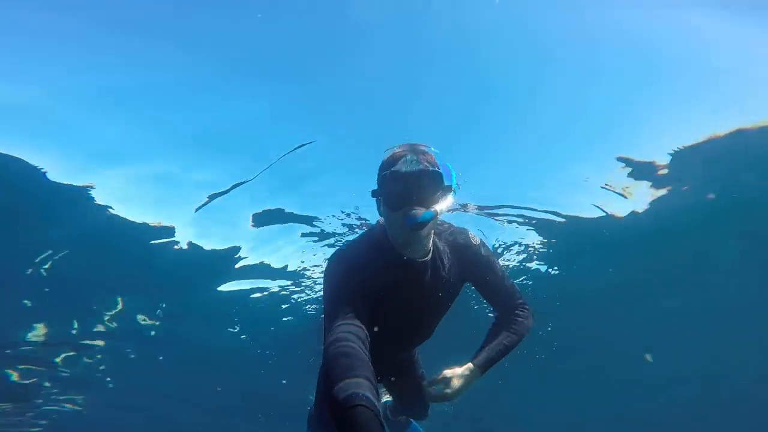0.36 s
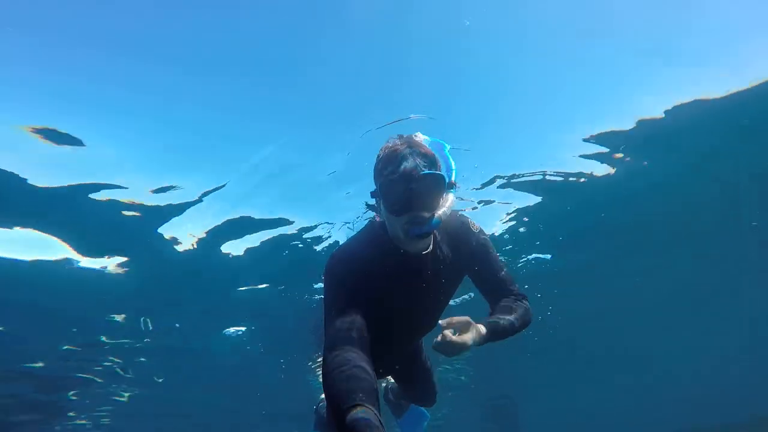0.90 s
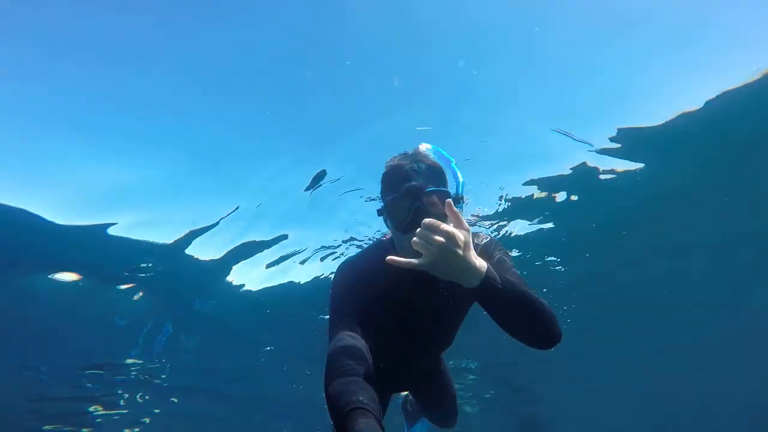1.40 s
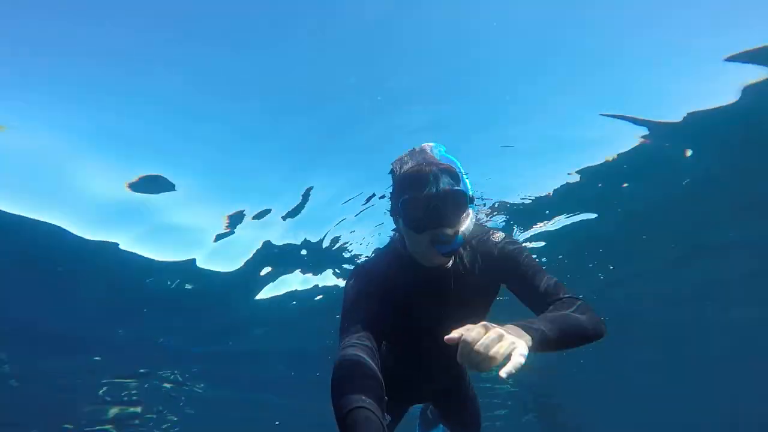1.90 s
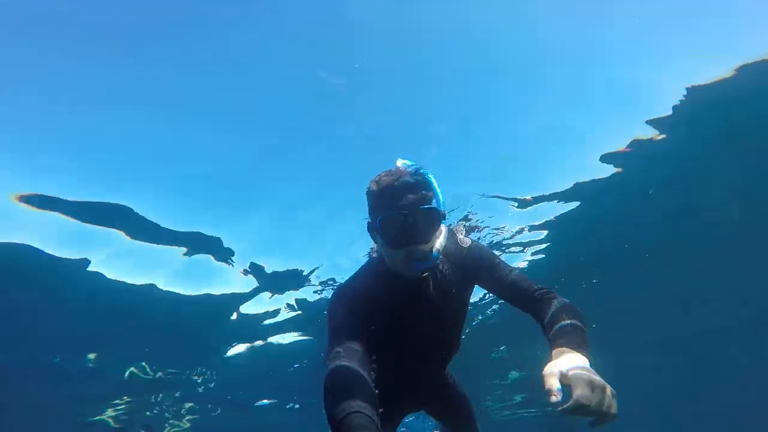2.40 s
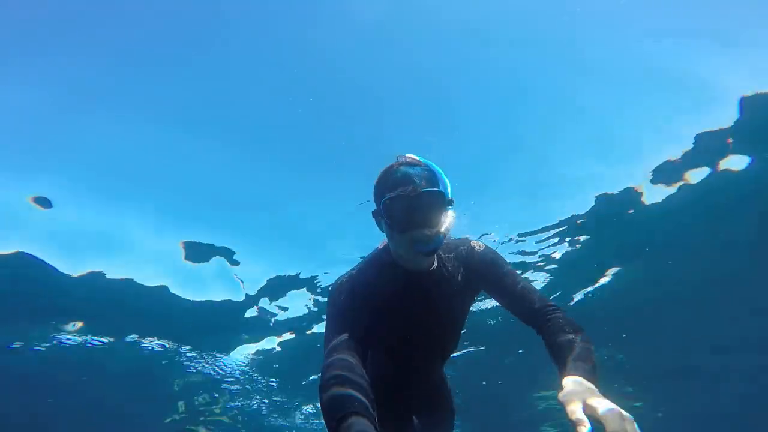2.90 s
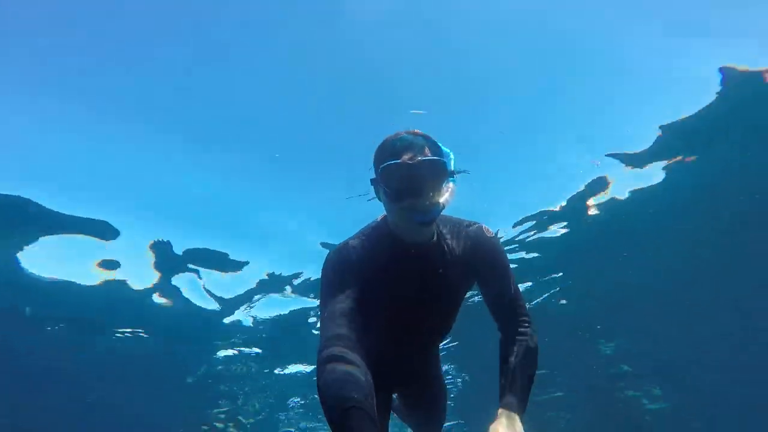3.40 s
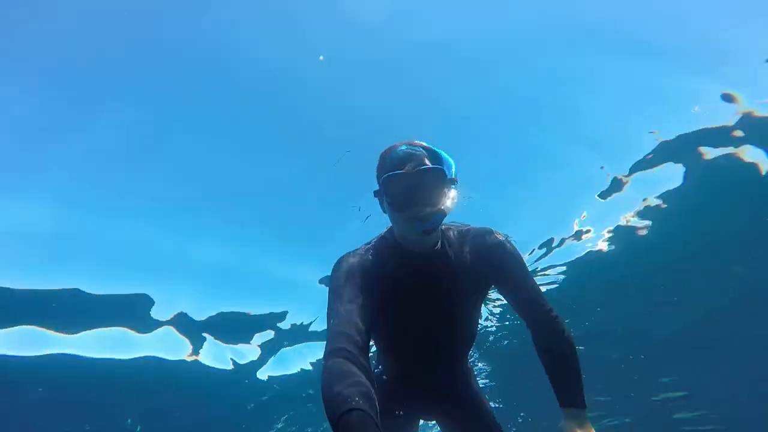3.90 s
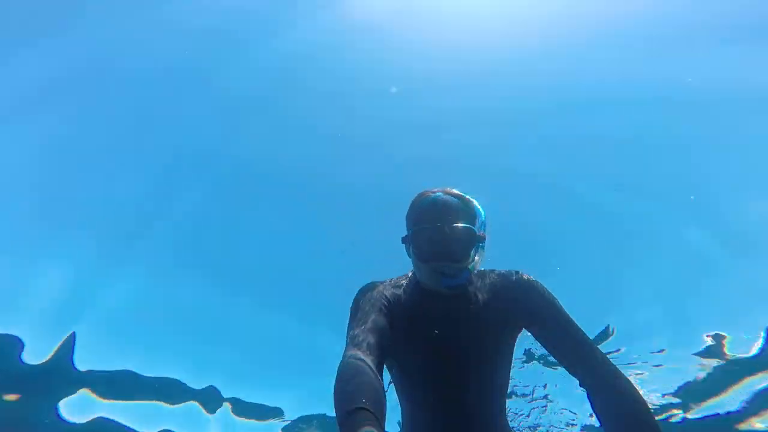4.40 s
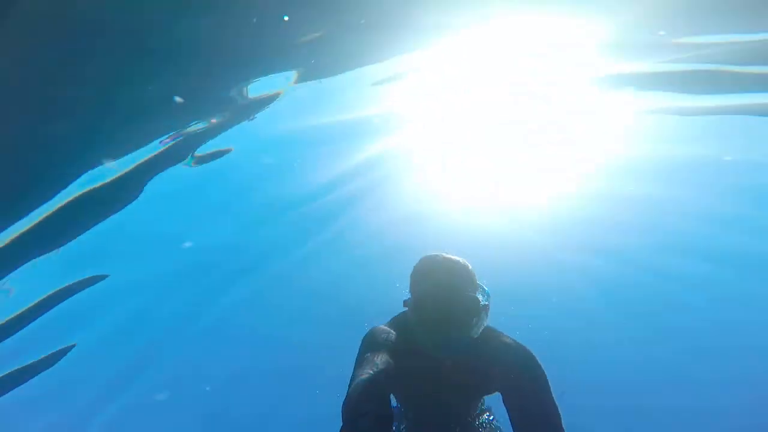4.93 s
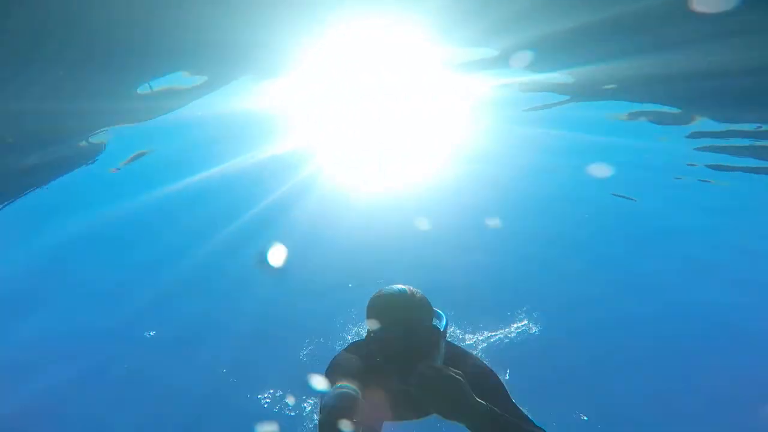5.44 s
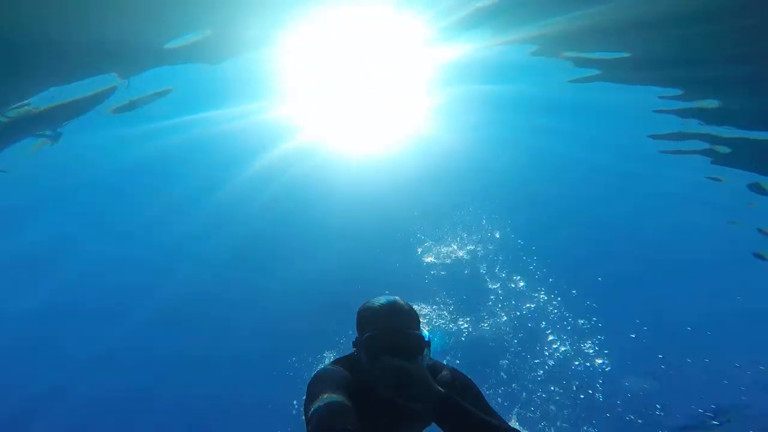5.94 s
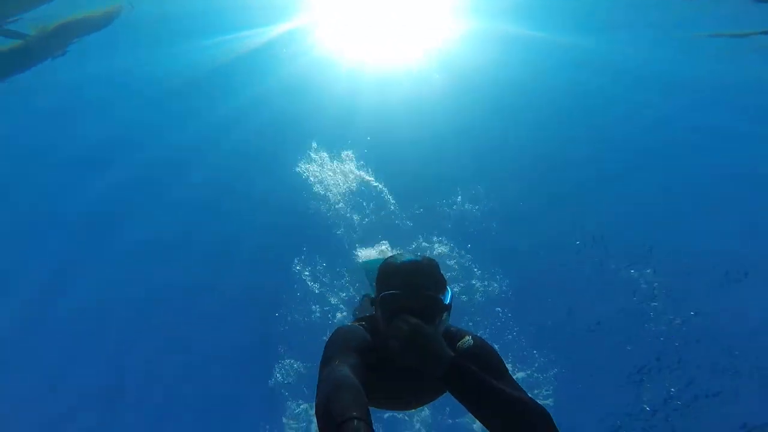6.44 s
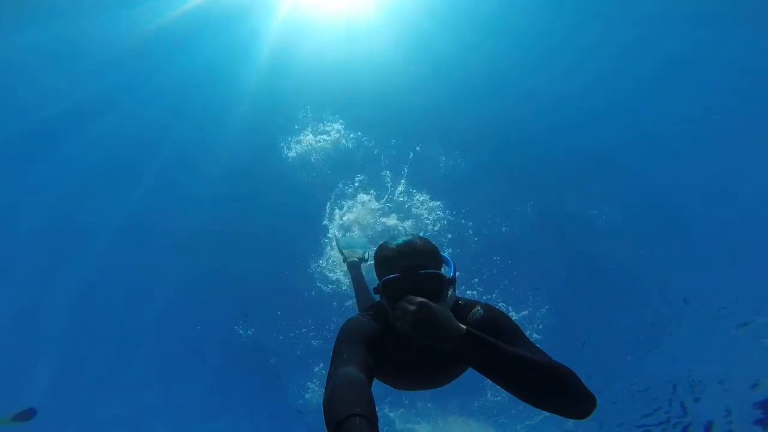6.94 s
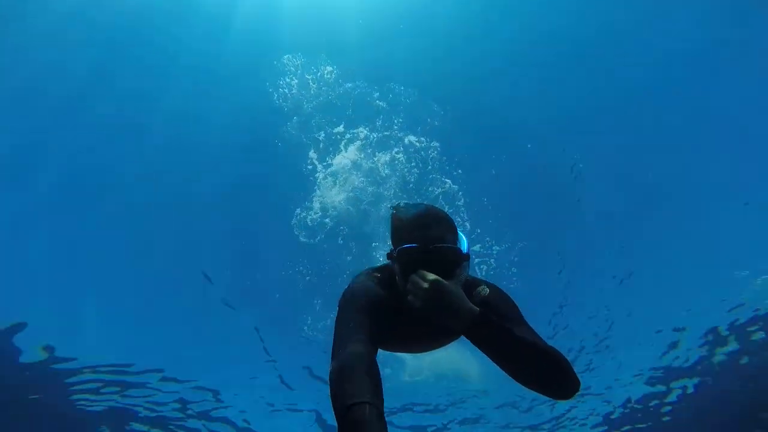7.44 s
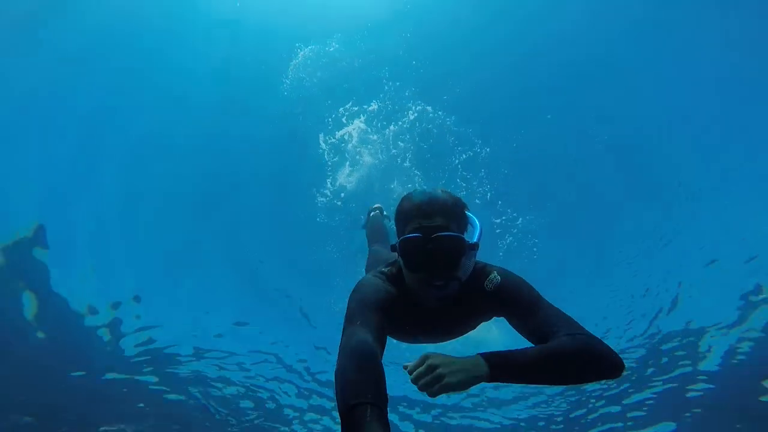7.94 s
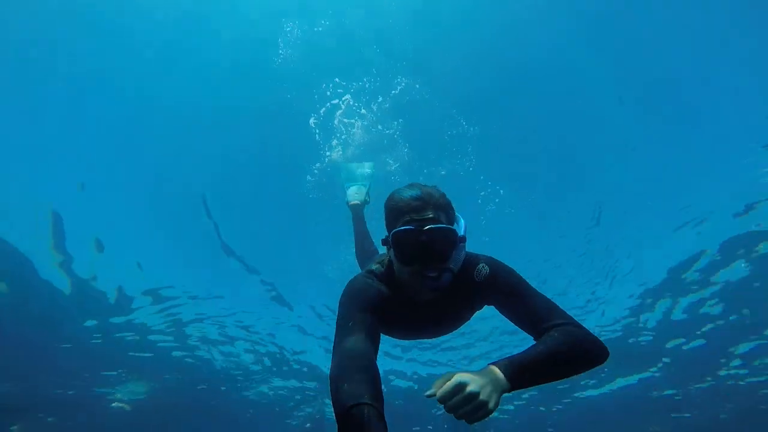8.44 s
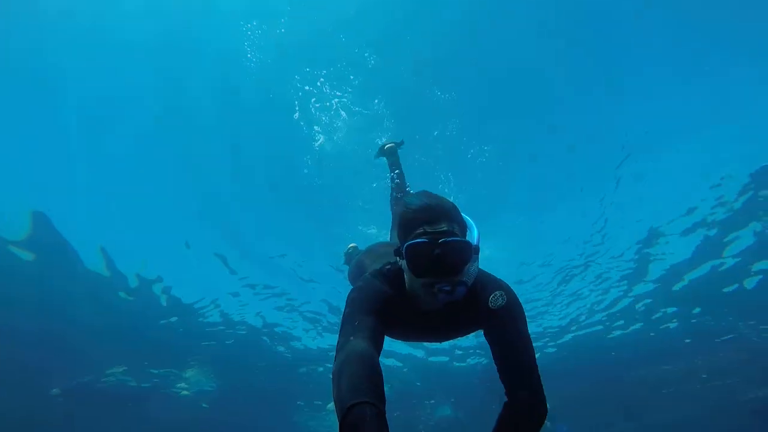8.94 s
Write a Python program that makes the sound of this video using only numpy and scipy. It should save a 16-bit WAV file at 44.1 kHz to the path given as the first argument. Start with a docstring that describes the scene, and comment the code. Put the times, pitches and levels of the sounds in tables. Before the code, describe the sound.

Muffled underwater rush in a sealed camera housing, bubbles plinking and glugging, then a violent burst of thumps, crackles and squeaks before a deeper hum.

```python
"""Snorkeller's dive, heard inside a sealed housing

A small camera in a sealed housing is held under the sea by a snorkeller who then dives.
The sea's rush is noise through the housing's resonances, with thin wavering sines whining beside it;
passing water is gusty low rumble with surges and thumps, and bubbles plink and glug as gliding sines.
In the turn at the surface trapped air crackles, squeaks and rattles out of the gaps: rings, pulses, noise ticks."""
import sys
import numpy as np
from scipy import signal
from scipy.fft import rfft, irfft
from scipy.io import wavfile
from scipy.ndimage import uniform_filter1d

SR = 44100
rng = np.random.default_rng(int(sys.argv[2]) if len(sys.argv) > 2 else 0)


def master_out(mix):
    """Clip the mix to full scale and print it as 16-bit PCM to the path in sys.argv[1]."""
    frames = np.transpose(np.atleast_2d(mix))
    ceiling = np.clip(frames, -1, 1)
    pcm = np.round(ceiling * 32767).astype(np.int16)
    wavfile.write(sys.argv[1], SR, pcm)


def nominal_scale(level):
    """Amplitude ratio for a level in decibels (scalar or array-like)."""
    x = np.asarray(level, float) / 20
    return 10 ** x


N = 400428
T = np.arange(N) / SR
DIVE_S, DIVE_LENGTH_S = 5.345, 0.62


def columns(table):
    """Each column after the first as a curve, joined by straight lines in time."""
    s, *rest = np.transpose(table)
    return [np.interp(T, s, c) for c in rest]


def band(x, hz, width_hz):
    """A steep resonance (applied twice) with gain 1 at the centre."""
    freq = np.arange(len(x) // 2 + 1) * SR / len(x) + 1  # the 1 avoids dividing by zero
    response = 1 / (1 + 1j * (freq - hz ** 2 / freq) / width_hz) ** 2
    return irfft(rfft(x) * response, len(x))


def unit(x):
    """Scale to rms 1."""
    return x / np.sqrt(np.mean(x ** 2))


def peak(x):
    """Scale to peak 1."""
    return x / np.abs(x).max()


def walk(rate):
    """Random levels held 1 / rate s and slewed twice; spread near 1."""
    hold = int(SR / rate)
    steps = np.repeat(rng.standard_normal(N // hold + 1), hold)
    return 1.3 * uniform_filter1d(uniform_filter1d(steps, hold), hold)[:N]


def add(out, s, grain):
    """Mix a grain in at time s."""
    i = int(s * SR)
    out[i:i + len(grain)] += grain[:N - i]


def ring(hz, t60, octaves, attack_ms):
    """A decaying sine that starts at hz and glides by the given octaves over its 60 dB decay time t60."""
    t = T[:int(t60 * SR)]
    phase = 2 * np.pi * np.cumsum(hz * 2 ** (octaves * t / t60)) / SR
    attack = 1 - np.exp(-(1000 * t / attack_ms) ** 2)
    shape = attack * 1000 ** (-t / t60)
    return np.sin(phase) * shape / shape.max()


def swell(from_hz, to_hz, length, bend):
    """A sine that swells and fades; its glide levels off early when bend is above 1."""
    along = np.linspace(0, 1, int(length * SR))
    hz = to_hz + (from_hz - to_hz) * (1 - along) ** bend
    phase = 2 * np.pi * np.cumsum(hz) / SR
    return np.sin(phase) * np.sin(np.pi * along ** 0.91)


# The sea's drive on the housing. Each row: time in seconds, noise level in dB,
# share of the deeper colour added to the dive's own 0 to 1.
SEA = [(0.0, -14.5, 0.0), (4.81, -14, 0.16), (5.13, -8.5, 0.84), (5.44, -16, 0.23), (6.12, -12, 0.0),
       (9.08, -11.5, 0.15)]


def drive_and_depth():
    """Level of the rush in dB, and depth: the dive's ramp from 0 to 1 plus passing shifts of colour."""
    level_db, extra = columns(SEA)
    dive = np.clip((T - DIVE_S) / DIVE_LENGTH_S, 0, 1)
    return level_db, np.clip(dive + extra, 0, 1.3)


# Housing resonances rung by the rush. Each row: centre in Hz, width of each filter pass in Hz,
# gain in dB near the surface, gain in dB deeper.
HOUSING = [(196, 187, -9.5, -7), (350, 276, -10.5, -7.5), (508.6, 125, -5.5, -5), (615, 137, 1, 2.5),
           (779, 125, -10, -1), (1219, 59, -16.5, -71), (1282, 118, -21.5, -12), (1640, 240, -22.5, -8.5),
           (1930, 195, -23.5, -14.5), (2126, 154, -17, -10.5), (2350, 200, -21.5, -19.5),
           (2580, 200, -21.5, -20), (2980, 353, -24.5, -23), (3733, 765, -27.5, -26.5),
           (5130, 580, -37.5, -38.5), (6300, 750, -41.5, -43.5), (7830, 1860, -47, -48.5),
           (9160, 1100, -51.5, -45), (10670, 1800, -51.5, -49.5), (12900, 2500, -52.5, -52.5)]


def sea(level_db, depth):
    """The rush in the housing's resonances, each flickering alone; pressure shifts their balance."""
    out = np.zeros(N)
    for hz, width_hz, near_db, deep_db in HOUSING:
        noise = band(rng.standard_normal(N), hz, width_hz)
        balance_db = near_db + depth * (deep_db - near_db)
        flicker_db = min(1.2, 4000 / hz) * walk(9)  # steadier in the treble
        out += noise * nominal_scale(level_db + balance_db + flicker_db)
    # under pressure two neighbouring resonances cancel between them
    return out - 0.64 * np.clip(depth, 0, 1) * band(out, 1043, 350)


# Water pushing past the housing. Each row: time in seconds, rumble rms in dB before gusts.
FLOW = [(0.0, -30.5), (1.39, -37.5), (2.6, -35.5), (3.54, -29), (3.87, -36), (4.1, -28.5), (4.45, -26.5),
        (4.8, -17.5), (5.15, -19), (5.5, -24), (5.65, -31), (5.9, -25), (6.6, -27.5), (7.13, -30),
        (7.55, -23), (7.95, -35.5), (8.85, -29.5), (9.05, -24)]


def flow():
    """Pressure swings of passing water: gusty rumble and a rougher buffeting that grows in strong flow."""
    level_db, = columns(FLOW)
    level_db = level_db + 3.0 * walk(7)  # gusts
    rumble = unit(band(band(rng.standard_normal(N), 30.7, 45.4), 34.5, 56.6))
    buffet_db = -15.5 + 0.11 * (level_db + 32) + 2.0 * walk(25)  # against the rumble
    buffet = unit(band(rng.standard_normal(N), 132.5, 120)) * nominal_scale(buffet_db)
    return nominal_scale(level_db) * (rumble + buffet)


# Heavy swings of water that shake the whole housing. Each row: start in seconds, peak in dB.
SURGES = [(3.489, -15), (4.53, -9), (4.88, -5), (4.995, -3.5), (5.046, -11), (5.194, -6), (5.86, -16),
          (5.973, -13), (6.006, -12.5)]


def surges():
    """The whole housing swings for about two low cycles."""
    out = np.zeros(N)
    for s, db in SURGES:
        add(out, s, nominal_scale(db) * swell(46.6, 46.6, 0.048, 1))
    return out


# Blows of water against the housing. Each row: start in seconds, peak in dB.
THUMPS = [(.372, -11.5), (2.39, -16), (3.236, -13), (4.513, -14), (4.692, -18), (4.718, -17), (4.756, -7.5),
          (4.822, -5), (4.995, -8), (5.109, -16), (5.856, -13)]


def thumps():
    """A blow rings for about one cycle while its pitch drops."""
    out, hz = np.zeros(N), 147
    for s, db in THUMPS:
        add(out, s, nominal_scale(db) * ring(hz, 1.15 / hz, -1.6, 0.7))
    return out


# Small bubbles. Each row: start in seconds, peak of the plink in dB, starting pitch in Hz.
BUBBLES = [(.07, -18, 795), (.159, -21, 820), (.666, -14, 554), (.751, -15, 758), (1.195, -18, 803),
           (1.266, -16, 732), (1.331, -21.5, 740), (1.397, -16.5, 853), (1.52, -19.5, 812),
           (1.68, -22, 836), (2.805, -16.5, 723), (2.822, -6.5, 695), (2.947, -18, 707), (3.017, -26, 684),
           (3.05, -15, 654), (3.212, -16.5, 727), (3.238, -24.5, 660), (3.377, -17, 720), (3.479, -18, 657),
           (3.631, -18.5, 820), (3.748, -20.5, 780), (3.763, -18, 726), (4.254, -14.5, 830),
           (4.305, -9.5, 1270), (4.995, -20, 746), (5.139, -14.5, 620.6), (5.164, -8, 635)]


def plinks():
    """Small bubbles plink with a rising pitch, and their pinch-off raps the housing."""
    out, rap = np.zeros(N), np.zeros(N)
    for s, db, hz in BUBBLES:
        louder_db = db + 15  # against a typical bubble
        rise_octaves = 0.32 - 0.02 * louder_db  # quiet bubbles glide further
        rap_db = -17.5 + 0.18 * louder_db  # the rap grows more slowly than the bubble
        add(out, s, nominal_scale(db) * ring(hz, 0.041, rise_octaves, 1.0))
        add(out, s, nominal_scale(rap_db) * ring(685, 0.035, 0, 0.3))
        rap[int(s * SR) + 15] = nominal_scale(-5)
    return out + band(rap, 1100, 1100)


# Large air pockets. Each row: start in seconds, length in seconds, peak in dB.
GLUGS = [(0.059, .058, -30), (.125, 0.061, -31.5), (0.368, 0.026, -21), (.74, 0.054, -33),
         (1.192, 0.11, -23.5), (1.268, 0.12, -23), (1.341, 0.099, -21.5), (1.408, 0.17, -32),
         (1.618, .12, -36), (2.795, 0.056, -25), (2.942, 0.1, -18), (3.019, 0.054, -19.5),
         (3.16, 0.069, -29), (3.207, 0.054, -20), (3.307, .08, -25.5), (3.402, 0.051, -21.5),
         (3.57, .057, -29.5), (3.623, 0.092, -24.5), (3.741, 0.057, -26.5), (4.247, 0.057, -26.5),
         (5.851, 0.05, -18), (6.329, .05, -25), (6.66, .11, -26), (6.765, 0.089, -26.5),
         (7.944, 0.048, -21), (8.087, 0.097, -27.5), (8.407, 0.18, -32.5), (8.674, 0.066, -27.5),
         (8.792, 0.04, -24.5)]


def glugs():
    """Large pockets swell and fade, climbing in pitch near the surface and holding it deeper."""
    out = np.zeros(N)
    top_hz, climb_hz_per_s, lowest_hz, deep_hz = 141.4, 605, 81, 105
    for s, length, db in GLUGS:
        if s < DIVE_S:
            # all climb to one top pitch, from lower down the longer they last
            low_hz = max(lowest_hz, top_hz - climb_hz_per_s * length)
            pocket = swell(low_hz, top_hz, length, 1.17)
        else:
            held_hz = deep_hz * (1 + 0.025 * rng.standard_normal())
            pocket = swell(held_hz, held_hz, length, 1)
        add(out, s, nominal_scale(db) * pocket)
    return out


# Smaller air pockets. Each row: start in seconds, length in seconds, start pitch in Hz,
# end pitch in Hz, peak in dB.
CHIRPS = [(3.478, 0.022, 1390, 2260, -15.5), (4.855, .012, 740, 642, -.5), (4.974, 0.051, 218, 247, -24),
          (5.072, 0.038, 223, 262, -23.5), (5.128, 0.025, 350, 390, -17), (5.381, 0.013, 1020, 1070, -17)]


def chirps():
    """Smaller pockets chirp or hoot: short swelling sines that glide."""
    out = np.zeros(N)
    for s, length, from_hz, to_hz, db in CHIRPS:
        add(out, s, nominal_scale(db) * swell(from_hz, to_hz, length, 1.42))
    return out


# Cracks of air leaving the gaps. Each row: start in seconds, level in dB before the housing wall, pitch in Hz.
CRACKS = [(.6665, -20, 1590), (3.237, -33, 1700), (3.4795, -28, 1490), (4.5195, -22.5, 1556),
          (4.6085, -37, 4460), (4.618, -32, 5130), (4.6315, -28, 4820), (4.6441, -16.5, 2780),
          (4.6535, -25, 4100), (4.7226, -26, 1600), (4.864, -22, 3180), (4.9291, 0, 1433),
          (4.9391, -8, 2800), (4.9489, 1, 1670), (4.9587, -17, 1640), (5.008, 0, 1554), (5.018, -7, 1610),
          (5.029, -21, 4170), (5.0496, -18, 1640), (5.0705, -9, 1670), (5.0898, -17, 1300),
          (5.0955, -30, 2260), (5.1116, -5.5, 1460), (5.1884, -16, 1880), (5.1635, -20, 1710),
          (5.201, -18, 1550), (5.2536, -13, 1570), (5.3193, -4, 2350), (5.4063, -25.5, 4200),
          (5.5254, -34.5, 5230), (5.5544, -35, 4950), (5.84, -35, 3850), (6.368, -36, 3780),
          (6.503, -39, 5000), (7.7, -39, 4150), (8.86, -40, 4000)]


def cracks(rattle_rows):
    """Each crack rings a small bubble with an upper ring and knocks the housing roughly."""
    out = np.zeros(N)
    fade = 1000 ** (-T[:2048] / 0.021)
    for s, db, hz in [*CRACKS, *(row[:3] for row in rattle_rows)]:
        rough = fade * rng.standard_normal(len(fade))
        knock = band(rough, hz, 0.5 * hz)
        knock += nominal_scale(-8.0) * band(rough, 1770, 1200) + nominal_scale(-17) * band(rough, 2040, 1500)
        t60 = 0.013 + 0.008 * rng.random()
        add(out, s, nominal_scale(db) * ring(hz, t60, 0.12, 0.16))
        add(out, s, nominal_scale(db - 7) * ring(1.87 * hz, t60, 0.1, 0.1))
        add(out, s, nominal_scale(db - 3.5) * peak(knock))
    # the housing wall passes little treble
    return signal.sosfilt(signal.butter(4, 5000, fs=SR, output="sos"), out)


# A gap rattling, as a curve. Each row: time in seconds, crack level in dB, pitch in Hz,
# level of the treble spit in dB against the crack.
RATTLE = [(5.327, -15.5, 2570, -28), (5.339, -6.5, 2460, -22), (5.364, -3.5, 2350, -16),
          (5.374, -13, 2930, -13), (5.385, -6, 3420, -15), (5.394, -12, 2940, -7)]


def rattle():
    """Rows (s, dB, Hz, spit dB) of one crack after another: nearly even gaps, uneven strength."""
    s, db, hz, spit_db = np.transpose(RATTLE)
    at = np.arange(s[0], s[-1], 0.0056)
    late, strong, small = rng.standard_normal((3, len(at)))
    return np.transpose([at + 0.0006 * late,
                         np.interp(at, s, db) + 4 * strong,
                         np.interp(at, s, hz) * (1 + 0.073 * small),
                         np.interp(at, s, spit_db)])


# Bright ticks as air spits out. Each row: start in seconds, peak in dB, centre in Hz.
SPITS = [(4.6441, -45, 9000), (4.653, -31, 7000), (4.7838, -27, 9400), (4.864, -31, 9500),
         (4.882, -24, 8950), (4.887, -28, 10900), (4.8962, -25, 9500), (4.9302, -16, 10500),
         (4.935, -22, 10000), (4.9388, -9, 7800), (4.944, -22, 12000), (4.949, -22, 10000),
         (4.959, -22, 11000), (4.964, -27, 11000), (5.008, -20, 8100), (5.11, -47, 6000),
         (5.205, -31.5, 8300), (5.2536, -23, 7500), (5.32, -18, 6200), (5.4063, -29, 6000),
         (5.5254, -36, 8500), (5.5544, -40, 8200), (6.322, -42, 11000), (7.018, -44, 9500),
         (7.7, -46, 8000)]


def spits(rattle_rows):
    """Air spits out in ticks of treble: short fading noise through a broad resonance."""
    out = np.zeros(N)
    fade = 1000 ** (-T[:2048] / 0.0057)
    # the rattle's spits scatter over the octave above 6 kHz
    rattled = [(s, db + spit_db, 6000 * 2 ** rng.random()) for s, db, _, spit_db in rattle_rows]
    for s, db, hz in [*SPITS, *rattled]:
        tick = band(fade * rng.standard_normal(len(fade)), hz, 3600)
        add(out, s, nominal_scale(db) * peak(tick))
    return out


# Harmonics of the squeak. Each row: multiple of the pulse rate, relative level in dB before its wobble.
SQUEAK_ORDERS = [(1, 0.5), (2, -7.5), (3, -1.5), (4, -8), (5, -15), (6, -6), (7, -10), (8, -23), (9, -17.5),
                 (10, -13)]


def squeak():
    """Air squeezed through a flapping slit: rough pulses, faster with pressure, with a puff of hiss in each."""
    pressure = np.interp(T, [5.251, 5.274, 5.298], [0, 1, 0])
    shape = 1 - (1 - pressure) ** 1.6
    edge_hz, peak_hz, edge_db, peak_db = 528, 573, -31.5, -11.5
    hz = edge_hz + shape * (peak_hz - edge_hz)
    level_db = edge_db + shape * (peak_db - edge_db)
    phase = 2 * np.pi * np.cumsum(hz * (1 + 0.024 * walk(400))) / SR
    tone = np.zeros(N)
    for k, order_db in SQUEAK_ORDERS:
        # the phase offset spreads each pulse out
        tone += nominal_scale(order_db + 2.5 * walk(300)) * np.cos(k * phase + 0.6 * k * k)
    puff = (1 + np.cos(phase)) * unit(band(rng.standard_normal(N), 5500, 10000))
    return (pressure > 0) * nominal_scale(level_db) * (tone + nominal_scale(-14.5) * puff)


# Fine fizz in the turn. Each row: time in seconds, froth level in dB,
# treble of the ticks in dB against the froth, before a fixed lift.
FIZZ = [(4.55, -53, -6), (4.65, -50, 4), (4.88, -37, -13), (4.97, -30.5, -9), (5.06, -33.5, -36),
        (5.23, -41.5, -24), (5.39, -25, -5), (5.41, -55, -3), (5.45, -51, -13)]


def fizz():
    """A froth of tiny ringing bubbles of very uneven size and strength, and fine ticks above them."""
    level_db, treble_db = columns(FIZZ)
    froth, ticks = np.zeros(N), np.zeros(N)
    start_s, end_s = FIZZ[0][0], FIZZ[-1][0]
    for when, size, chance, cycles in rng.random((520, 4)):
        s = start_s + when * (end_s - start_s)
        hz = 500 * 2 ** (3.05 * size)
        gain = nominal_scale(-3.0 * np.log(1 - chance))  # a few stand out
        add(froth, s, gain * ring(hz, (14 + 30 * cycles) / hz, 0.24, 0.26))
        ticks[int(s * SR)] = gain
    return nominal_scale(level_db) * (froth + nominal_scale(treble_db + 7.5) * band(ticks, 5700, 7000))


def crackle():
    """Faint stray ticks of small bubbles trailing the diver on the way down."""
    out, start_s = np.zeros(N), 5.5
    for when, size, chance in rng.random((110, 3)):
        hz = 3000 * 4 ** size
        db = -41 - 2.1 * np.log(1 - chance) - 10 * size
        add(out, start_s + when * (N / SR - start_s), nominal_scale(db) * ring(hz, 6 / hz, 0.1, 0.08))
    return out


# Pitches of the thin tones in Hz, before they waver.
WHINE_HZ = [765, 818, 1187, 1341.5, 1397, 1477.5, 1609.5, 1898.5, 1952, 2136, 2242, 2373, 2585, 6300, 12618]
# Their levels, in the same order. Each row: rms in dB near the surface, rms in dB deeper, before they waver.
WHINE_DB = [(-55, -48), (-53.5, -51), (-54.5, -51.5), (-64, -57), (-87, -59.5), (-66.5, -53.5), (-60, -49),
            (-63, -62), (-69, -50.5), (-81, -56), (-61, -54.5), (-61.5, -53.5), (-74, -60.5), (-75, -76),
            (-91, -88)]


def whine(depth):
    """Faint thin sines that waver in pitch and level and change balance with depth."""
    out = np.zeros(N)
    for hz, (near_db, deep_db) in zip(WHINE_HZ, WHINE_DB):
        phase = 2 * np.pi * np.cumsum(hz + 1.536 * walk(6)) / SR
        waver_db = min(3.0, 3500 / hz) * walk(3.06)
        level_db = near_db + depth * (deep_db - near_db) + waver_db
        out += np.sqrt(2) * np.sin(phase) * nominal_scale(level_db)
    return out


def scene():
    """All sources at the one microphone."""
    level_db, depth = drive_and_depth()
    rattle_rows = rattle()
    water = sea(level_db, depth) + flow() + surges() + thumps()
    pockets = plinks() + glugs() + chirps()
    escaping = cracks(rattle_rows) + spits(rattle_rows) + squeak() + fizz()
    return (water + pockets + escaping + crackle() + whine(depth))[None]


def top_cut(x):
    """Nothing passes above the cut-off."""
    return signal.sosfilt(signal.butter(12, 16000, fs=SR, output="sos"), x)


def record(dry):
    """The microphone rounds the loudest peaks."""
    soft = np.tanh(0.76 * dry) / 0.84
    return top_cut(soft)


dry = scene()
out = record(dry)
master_out(out)
```